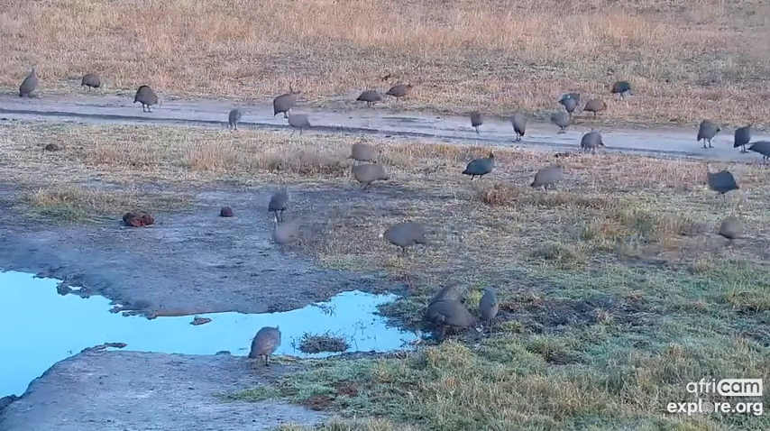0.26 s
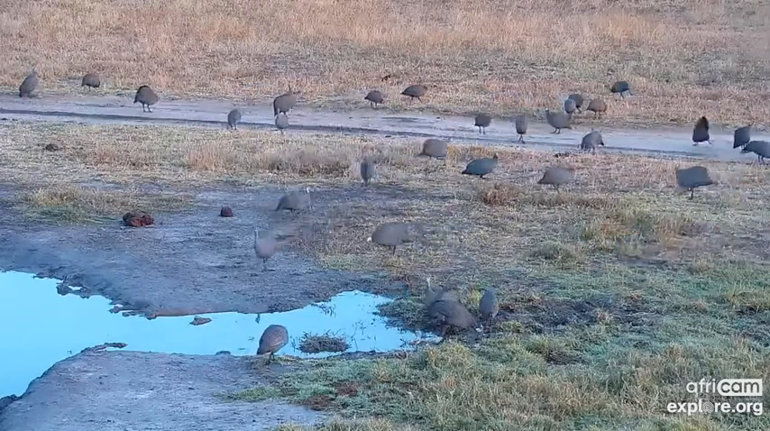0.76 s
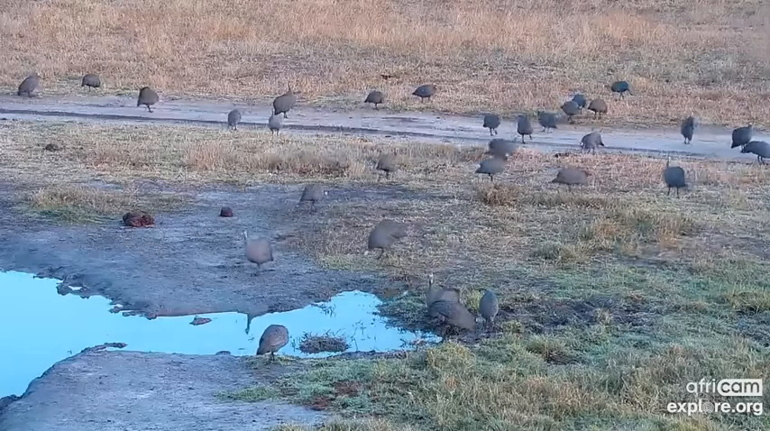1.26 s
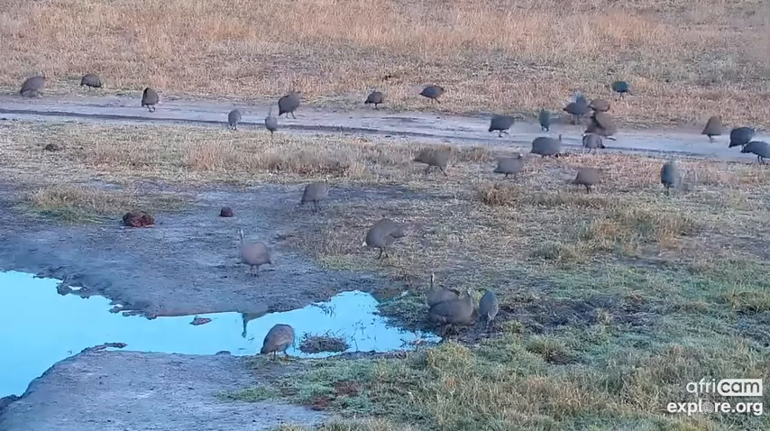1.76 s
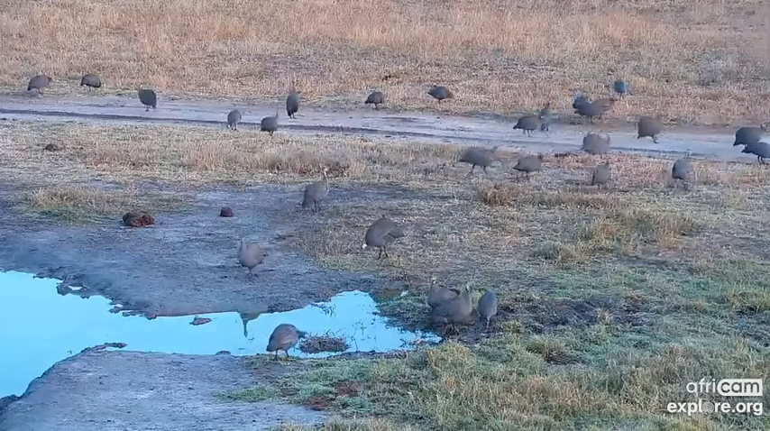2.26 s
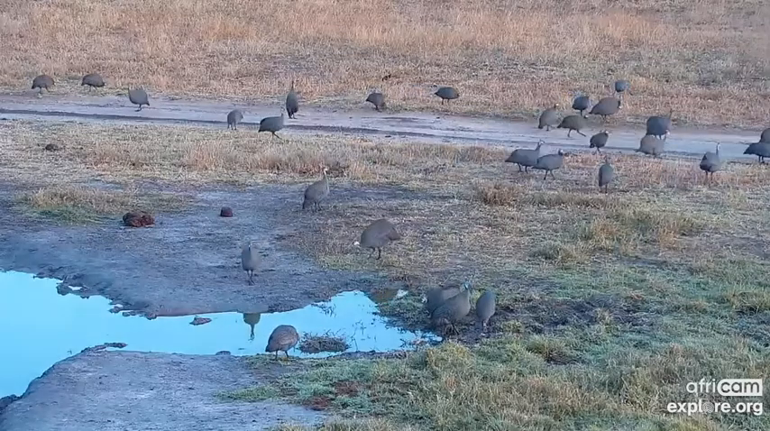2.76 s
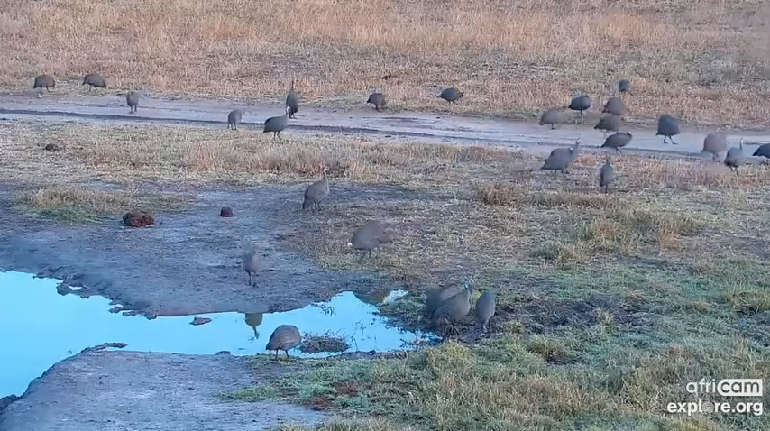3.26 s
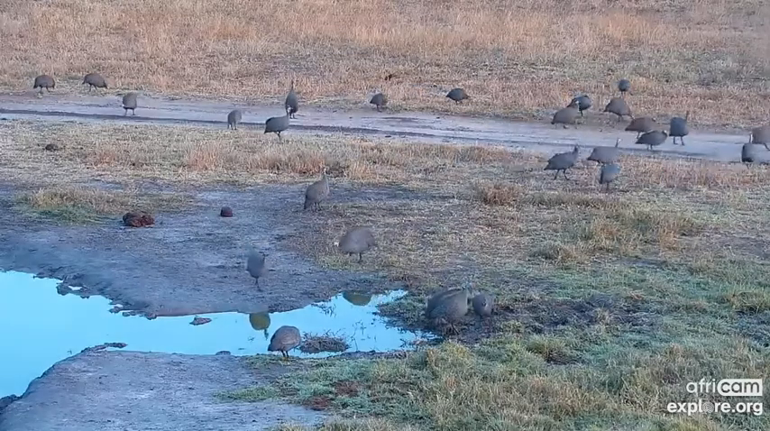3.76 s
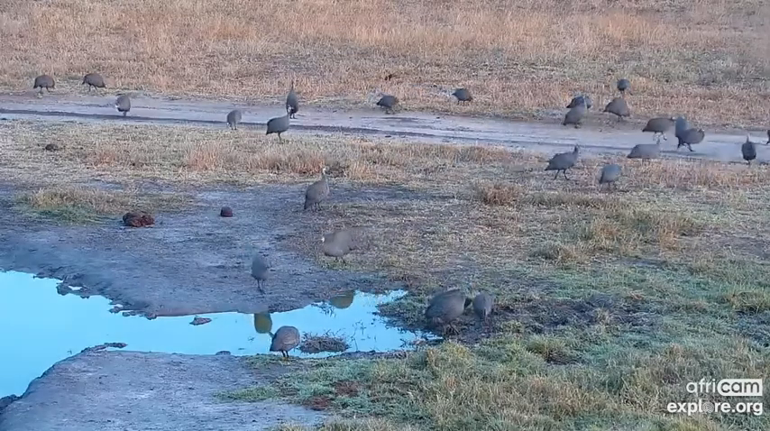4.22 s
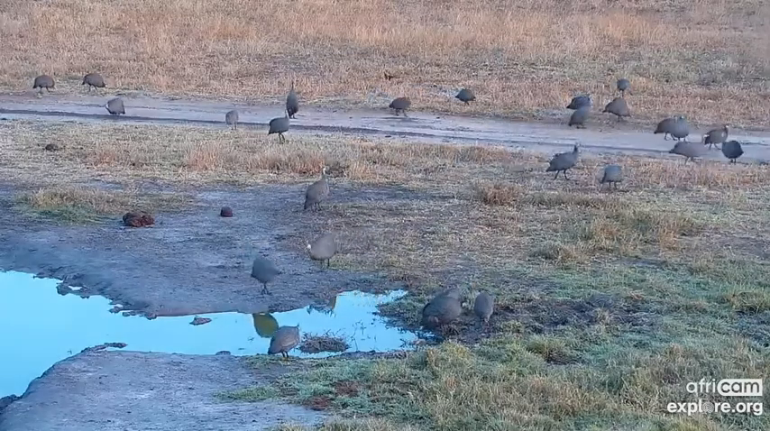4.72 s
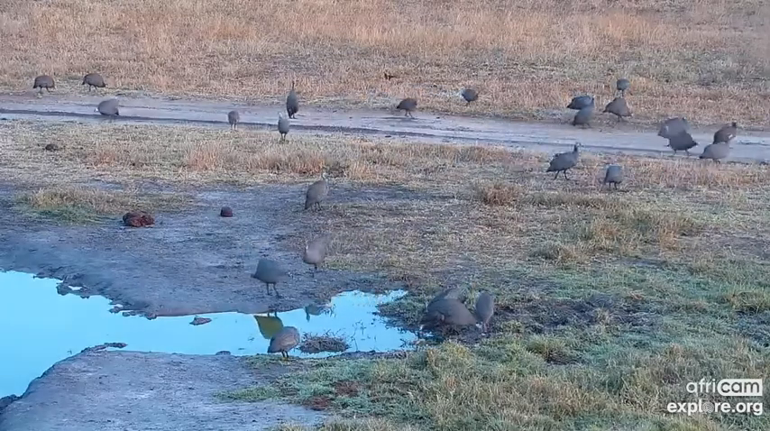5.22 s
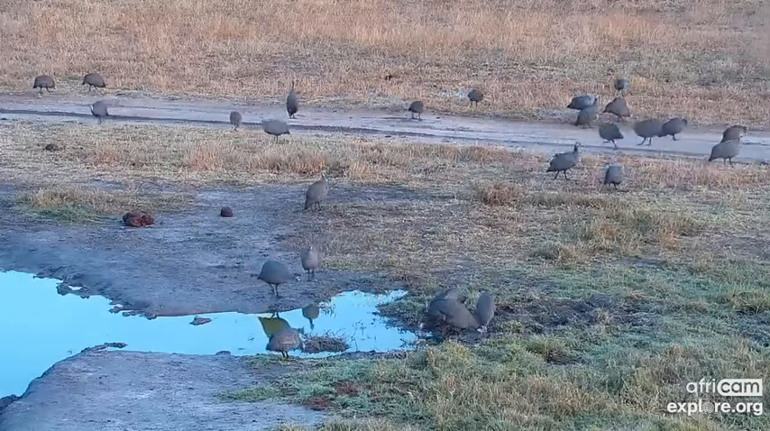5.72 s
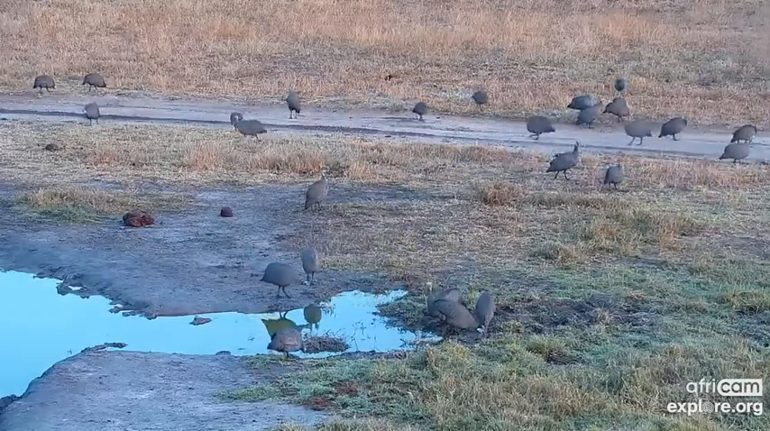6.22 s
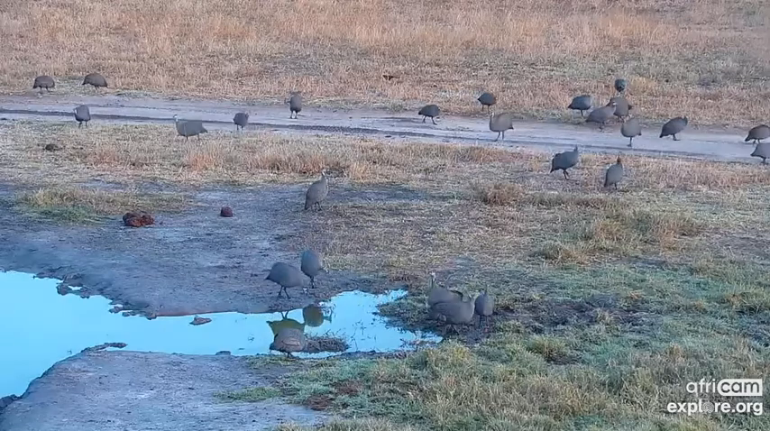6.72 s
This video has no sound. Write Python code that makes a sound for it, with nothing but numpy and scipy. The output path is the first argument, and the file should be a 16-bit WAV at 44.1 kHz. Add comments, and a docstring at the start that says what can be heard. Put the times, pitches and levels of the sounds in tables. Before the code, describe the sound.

A nearby guineafowl chirps and squeaks sharply while its flock pipes farther off, and a distant generator hums steadily.

```python
"""Guineafowl at a waterhole

A flock forages in open bush. Each voice is a membrane in the syrinx, set vibrating by the breath.
Close by, a sharp chirp repeats among squeaks and clucks; other birds pipe and whistle from farther off,
scattered by the scrub. Dry grass rustles, and a distant engine, probably a generator, hums steadily."""
import sys
import numpy as np
from scipy import signal
from scipy.fft import rfft, irfft
from scipy.io import wavfile

SR = 44100
rng = np.random.default_rng(int(sys.argv[2]) if len(sys.argv) > 2 else 0)


def inscribe(sig):
    """Save sig as 16-bit PCM at rate SR to the path in sys.argv[1].

    A 1-D sig is mono; a 2-D sig holds one channel per row.
    Samples are clipped to [-1, 1] before scaling.
    """
    pcm = np.round(np.clip(np.atleast_2d(sig).T, -1, 1) * 32767)
    wavfile.write(sys.argv[1], SR, pcm.astype(np.int16))


N = 307818

# Spectrum of dry hiss, from breath or grass. Each row: frequency in Hz, gain in dB.
HISS_SPECTRUM = [(1200, -17), (3000, 3.5), (6000, 1.5), (8000, 5.5), (11000, -8)]


def chirps(jitter=0.011, onset_jitter=0.03, flutter_db=2.0, rasp_db=-17, onset_db=-4,
           settle_s=0.0028, dispersion=0.85, lead_hz=2400, lead_s=.0155, lead_db=9):
    """Source and filter: a near bird's throat shapes the harmonics and breath noise of its syrinx."""
    # Each row: start in seconds, length in seconds, top pitch in Hz, level in dB,
    # tilt in dB per octave, level of the trailing rasp in dB.
    calls = [(-.008, .03, 1882, -12, -.5, -44), (.408, 0.03, 1892, -12, -0.5, -35.5),
             (.823, .032, 1881, -12, -.5, -34.5), (1.269, .028, 1866, -9.5, .5, -37.5),
             (1.7, 0.03, 1836, -10, 0, -33.5), (2.117, 0.026, 1796, -9, 0, -34.5),
             (3.475, 0.022, 1985, -11, 1, -34), (3.922, 0.031, 1970, -10.5, .5, -33),
             (4.332, 0.027, 1898, -11, 0, -39), (6.591, .016, 1767, -9.5, -2, -57)]
    # Pitch arch. Each row: share of the call, ratio to the top pitch.
    arch = [(0, .96), (.2, .988), (.42, 1), (.65, .992), (1, .955)]
    # Throat resonances. Each row: frequency in Hz, gain in dB.
    throat = [(1700, -22), (1950, -6.5), (2600, -0.5), (3450, -12.5), (3750, -3.5), (5300, -1.5),
              (5900, -0.5), (7050, -1.5), (7500, -6.5), (8800, -14), (9800, -18), (10900, -24.5),
              (12500, -48)]
    out = np.zeros(N)
    for start, length, top_hz, db, tilt_db, trail_db in calls:
        u, gate = note(length, edge_s=0.0026)
        pitch = top_hz * along(arch, u)[0]
        unsettled = np.exp(-u * length / settle_s)   # the membranes need a few cycles to lock
        phase = phase_of(pitch * (1 + (jitter + onset_jitter * unsettled) * wobble(len(u), 700)))
        voice = 0
        for k in range(1, 7):
            level = at_hz(throat, k * pitch) + tilt_db * np.log2(k / 3)
            level += flutter_db * wobble(len(u), 300)
            lag = dispersion * k * k   # the throat delays higher harmonics and smears each pulse
            voice += from_db(level) * np.cos(k * phase - lag)
        breath = coloured(rng.standard_normal(len(u)), throat) * (1 + np.cos(phase))   # a puff a cycle
        rasp = from_db(rasp_db) + from_db(onset_db) * unsettled
        add(out, start - .001, from_db(db) * gate * (voice + rasp * breath))
        # a tiny peep leads the call as the syrinx opens
        u, gate = note(0.0047, edge_s=0.0027)
        peep = whistle(np.full(len(u), lead_hz), rough=0.36, overtone_db=-12.5, rasp_hz=1520)
        add(out, start - lead_s, from_db(trail_db + lead_db) * gate * peep)
        add(out, start + length, trailing_rasp(trail_db))
    return out


def squeaks(hiss_db=-35, drop_per_s2=110):
    """Pitch and amplitude modulation: a thin, hissy whistle arches over and is loudest as it lands."""
    # Each row: start in seconds, length in seconds, top pitch in Hz, landing level in dB,
    # swell in dB, roughness from 0 to 1.
    calls = [(0.26, .028, 4640, -29, 31, 0.13), (2.556, .033, 4310, -11, 10.5, 0.18),
             (2.775, 0.037, 5000, -28, 15, 0.4), (2.984, .047, 5050, -29, 22, 0.34),
             (3.522, 0.036, 4650, -12.5, 26, 0.35), (3.81, 0.03, 4880, -18.5, 23, 0.38),
             (4.167, 0.03, 5300, -32, 17, 0.76), (4.267, .032, 4520, -39, 14, 0.3),
             (4.767, 0.036, 4530, -25.5, 9, 0.38), (5.065, 0.033, 5000, -24, 27, 0.23),
             (5.161, .036, 5430, -35.5, 4, 0.25), (5.987, .042, 4995, -1, 48, 0.25),
             (6.28, .034, 5160, -20.5, 33, 0.37), (6.649, 0.037, 4770, -15, 16, 0.37),
             (6.915, .033, 4740, -18, 28, 0.14)]
    # Contour. Each row: share of the call, pitch height (1 at the top), share of the swell.
    contour = [(0, -0.983, -1.2), (.2, .4, -0.84), (.42, 0.98, -0.57), (.58, 0.74, -0.3),
               (.72, 0.011, -0.1), (.8, -0.0076, -0.011), (.9, -0.07, -0.14), (1, -0.11, -0.68)]
    out = np.zeros(N)
    for start, length, top_hz, db, swell_db, rough in calls:
        u, gate = note(length, edge_s=0.0016)
        height, swell = along(contour, u)
        pitch = top_hz * (1 - drop_per_s2 * length ** 2 * (1 - height))   # longer calls drop farther
        breath = coloured(rng.standard_normal(len(u)), HISS_SPECTRUM)
        hiss = from_db(hiss_db) * rough * np.sqrt(u) * breath
        add(out, start, gate * (from_db(db + swell_db * swell) * whistle(pitch, rough) + hiss))
    return out


def clucks(fall=0.12, jitter=0.032, step_db=-13, dispersion=0.66, taper_db=6, trail_db=-22):
    """Register break: the voice drops low for a few milliseconds, mostly at the end of a squeak."""
    # Each row: start in seconds, length in seconds, pitch in Hz, levels of harmonics 1, 2, 3 in dB.
    calls = [(0.289, 0.011, 1920, -35, -58, -56), (2.59, .0055, 1620, -36, -28, -38),
             (3.026, .0075, 1843, -31, -34, -36), (3.557, 0.0084, 1657, -17, -20, -12.5),
             (4.202, 0.0094, 1886, -22, -20.5, -17.5), (4.298, 0.0074, 1670, -23, -20.5, -26),
             (4.804, 0.0086, 1670, -28, -23.5, -16.5), (6.0265, 0.0059, 1688, -28, -5.5, -17.5),
             (6.373, 0.0084, 1650, -35, -37.5, -43), (6.68, .014, 1670, -24.5, -26.5, -23)]
    out = np.zeros(N)
    for start, length, hz, *levels in calls:
        u, gate = note(length, edge_s=0.0018)
        phase = phase_of(hz * (1 - fall * (u - .5) + jitter * wobble(len(u), 1100)))
        levels += [levels[-1] + step_db * k for k in range(1, 4)]   # harmonics 4 to 6 roll off
        voice = sum(from_db(db) * np.cos(k * phase - dispersion * k * k)
                    for k, db in enumerate(levels, 1))
        taper = from_db(taper_db * (0.1751 - (2 * u - 1) ** 2))
        add(out, start - .001, taper * gate * voice)
        add(out, start + length, trailing_rasp(levels[2] + trail_db, length=0.043))
    return out


def trailing_rasp(db, length=0.042, fall_db=10, grain_db=4.0, grain_hz=200):
    """Exponential decay: a dry, grainy band of noise dies away after a call."""
    # Each row: frequency in Hz, gain in dB.
    spectrum = [(1300, -19), (2400, 6), (3600, 9.5), (5300, -6), (7500, -3), (11000, -13)]
    u, gate = note(length, edge_s=0.0023)
    level = db - fall_db * u + grain_db * wobble(len(u), grain_hz)
    return from_db(level) * gate * coloured(rng.standard_normal(len(u)), spectrum)


def pipes(lift=0.0302, swell_db=11, brighten_db=7, jitter=0.0022):
    """Strong odd harmonics make a hollow timbre; these long notes brighten as they swell."""
    # Each row: start in seconds, length in seconds, pitch in Hz, level in dB, overtone gain in dB.
    calls = [(.44, 0.18, 1830, -40, 2), (1.30, 0.18, 1845, -32, -0.5), (2.15, 0.23, 1805, -30.5, 1),
             (3.04, 0.26, 1808, -31, -2), (4.99, .295, 1818, -34.5, -10), (5.89, .25, 1829, -30.5, -12),
             (6.795, 0.29, 1794, -28, 1)]
    # Each row: harmonic number, relative level in dB.
    harmonics = [(1, -4), (2, -21.5), (3, -8.5), (4, -18.5)]
    out = np.zeros(N)
    for start, length, hz, db, overtones_db in calls:
        u, gate = note(length, edge_s=0.0094)
        phase = phase_of(hz * (1 + lift * u ** 3 + jitter * wobble(len(u), 120)))
        off_peak = abs(u - .75)
        bright_db = overtones_db - brighten_db * off_peak
        voice = sum(from_db(level + bright_db * (k > 1) + 0.67 * wobble(len(u), 32)) * np.sin(k * phase)
                    for k, level in harmonics)
        add(out, start, from_db(db - swell_db * off_peak) * gate * voice)
    return out


def whistle(hz, rough, jitter=0.045, flutter_db=7.0, rough_hz=260, overtone_db=-31, rasp_hz=480):
    """Random modulation: an unsteady membrane shakes a near sine and spreads noise sidebands round it."""
    size = len(hz)
    phase = phase_of(hz * (1 + jitter * rough * wobble(size, rough_hz)))
    tone = np.sin(phase) + from_db(overtone_db) * np.sin(2 * phase)
    flutter = from_db(flutter_db * rough * (wobble(size, rough_hz) - .5))
    sidebands = wobble(size, rasp_hz) * np.sin(phase) + wobble(size, rasp_hz) * np.cos(phase)
    return tone * flutter + 0.85 * rough * sidebands


def slurs(settle=4.5, rough=0.23, overshoot=.17):
    """Exponential relaxation: a whistle starts high and clears as it settles on a held note."""
    # Each row: start in seconds, length in seconds, final pitch in Hz, level in dB.
    calls = [(0.577, 0.065, 3600, -29.5), (0.698, .052, 3570, -29.5), (0.785, 0.081, 3610, -26.5),
             (0.902, 0.069, 3490, -29), (0.973, 0.026, 3850, -24), (3.881, .10, 3520, -31),
             (4.16, .073, 3510, -27.5), (4.361, 0.074, 3550, -28.5), (4.476, 0.049, 3540, -27.5),
             (4.576, 0.06, 3506, -29.5), (4.683, 0.042, 3446, -32), (6.691, .091, 3596, -27),
             (6.815, 0.072, 3560, -28.5), (6.922, 0.085, 3620, -26.5)]
    # Each row: share of the call, gain in dB.
    envelope = [(0, -10), (.14, -7.5), (.21, -4), (.6, 3.5), (.8, -1), (1, -8)]
    out = np.zeros(N)
    for start, length, hz, db in calls:
        u, gate = note(length, edge_s=0.0052)
        pitch = hz * (1 + overshoot * np.exp(-settle * u))
        voice = whistle(pitch, rough * np.exp(-2 * u))
        add(out, start, from_db(db + along(envelope, u)[0]) * gate * voice)
    return out


def whistled(calls, bend, rough, falter_db=2.0, falter_hz=50):
    """Amplitude envelope: whistles swell, falter and fade; bend(share, length) is their pitch ratio."""
    # Each row: share of the call, gain in dB.
    envelope = [(0, -7.5), (.15, -3), (.5, -0.5), (.8, -2), (1, -6.5)]
    out = np.zeros(N)
    for start, length, hz, db in calls:
        u, gate = note(length, edge_s=0.0045)
        level = db + along(envelope, u)[0] + falter_db * wobble(len(u), falter_hz)
        add(out, start, from_db(level) * gate * whistle(hz * bend(u, length), rough))
    return out


def peeps(crest=0.39, rise_octaves=.44, fall_octaves=.52, ease=1.4):
    """A two-way frequency sweep: a quick climb to a pointed crest, then a slide that eases off."""
    # Each row: start in seconds, length in seconds, crest pitch in Hz, level in dB.
    calls = [(.553, 0.039, 3250, -36), (.924, 0.058, 5470, -32.5), (2.365, 0.051, 4300, -30.5),
             (2.402, 0.043, 3440, -34.5), (2.518, 0.069, 4020, -30), (2.853, .035, 5630, -43),
             (3.343, .055, 4000, -41), (5.143, .06, 4180, -31), (5.207, 0.048, 3740, -31.5),
             (5.309, 0.061, 4600, -29), (5.376, 0.036, 3750, -32)]

    def bend(u, length):
        climb = np.clip(u / crest, 0, 1)
        slide = np.clip((u - crest) / (1 - crest), 0, 1)
        return 2 ** (-rise_octaves * (1 - climb) - fall_octaves * (1 - (1 - slide) ** ease))
    return whistled(calls, bend, rough=0.39, falter_db=2.5, falter_hz=90)


def sighs(fall_octaves=.35):
    """An exponential sweep: husky whistles sink by equal intervals in equal times."""
    # Each row: start in seconds, length in seconds, first pitch in Hz, level in dB.
    calls = [(1.028, 0.094, 4050, -28), (1.295, .08, 3580, -28.5), (2.321, 0.034, 5400, -40),
             (2.465, 0.042, 1450, -39), (2.548, .035, 3460, -33), (2.592, 0.03, 4140, -32),
             (2.679, .15, 1165, -40.5), (3.378, 0.066, 3050, -33.5), (3.612, .035, 3200, -35),
             (3.672, .067, 3230, -35.5), (3.974, 0.038, 3720, -30), (4.229, 0.037, 3700, -37.5),
             (4.811, 0.021, 2800, -35), (4.865, 0.093, 3920, -30.5)]
    return whistled(calls, lambda u, length: 2 ** (-fall_octaves * u), rough=.28)


def upturns(lift=.125):
    """A cubic glide: clear notes start level and turn up at the end."""
    # Each row: start in seconds, length in seconds, first pitch in Hz, level in dB.
    calls = [(.544, .14, 2130, -37.5), (1.21, .13, 2120, -34.5), (3.738, 0.14, 2280, -41),
             (5.598, 0.14, 2187, -38.5), (6.255, 0.16, 2134, -39.5)]
    return whistled(calls, lambda u, length: 1 + lift * u ** 3, rough=0.16)


def held_notes(sag=0.0327):
    """Nearly steady oscillation: clear notes whose pitch barely sags."""
    # Each row: start in seconds, length in seconds, middle pitch in Hz, level in dB.
    calls = [(-.03, 0.093, 2580, -29.5), (2.414, 0.187, 2655, -43), (4.952, .15, 2627, -33.5),
             (6.316, .14, 2614, -33)]
    return whistled(calls, lambda u, length: 1 - sag * (u - .5), rough=0.13)


def lisps(rise_per_s=.8):
    """A linear sweep: high, breathy notes climb at a steady rate."""
    # Each row: start in seconds, length in seconds, first pitch in Hz, level in dB.
    calls = [(1.607, .13, 6440, -46), (2.521, 0.13, 6570, -47), (6.143, .055, 6430, -42)]
    return whistled(calls, lambda u, length: 1 + rise_per_s * u * length, rough=0.38)


def mews(top=0.23, bend_per_s2=27):
    """A Gaussian pitch arc: short, low notes stay near its top, long ones droop."""
    # Each row: start in seconds, length in seconds, top pitch in Hz, level in dB.
    calls = [(2.565, 0.17, 1860, -39.5), (2.879, 0.028, 1663, -29.5), (5.797, 0.137, 1870, -41),
             (6.756, .035, 1570, -39)]
    return whistled(calls, lambda u, length: np.exp(-bend_per_s2 * ((u - top) * length) ** 2), rough=0.13)


def pips(fall=0.14, period_s=.039, pip_s=.013):
    """Tone bursts: soft, low, falling notes, single or in evenly paced runs."""
    # Each row: start in seconds, length of the run in seconds, middle pitch in Hz, level in dB.
    runs = [(.169, .02, 1130, -44), (.61, .02, 1140, -41), (1.325, .14, 1285, -40.5),
            (4.879, .17, 1300, -48)]
    calls = [(start + delay, pip_s, hz, db)
             for start, length, hz, db in runs for delay in np.arange(0, length, period_s)]
    return whistled(calls, lambda u, length: 1 - fall * (u - .5), rough=.28)


def far_flock(count=55, level_db=-48, centre_hz=4000, spread=0.5, fall=0.201, size_db=8):
    """Independent sources: far birds give faint falling peeps at random, the longer ones louder."""
    out = np.zeros(N)
    for when, size, pitch in rng.random((count, 3)):
        u, gate = note(0.018 + 0.036 * size, edge_s=0.0092)
        hz = centre_hz * np.exp(spread * (2 * pitch - 1) - fall * (u - .5))
        level = level_db + size_db * (size - .5)
        add(out, when * N / SR, from_db(level) * gate * whistle(hz, rough=0.51))
    return out


def ticks(gain_db=-3, decay_s=0.0017, low_cut_hz=2800):
    """Broadband transients: noise that decays within milliseconds is heard as small dry clicks."""
    # Each row: start in seconds, relative level in dB.
    clicks = [(1.0715, -26.5), (1.5878, -23), (2.8344, -27.5), (3.0464, -26), (3.3159, -23.5),
              (4.6104, -23), (5.5613, -28), (6.134, -24.5), (6.5161, -23.5), (6.8623, -22.5)]
    out = np.zeros(N)
    t = np.arange(SR // 50) / SR
    for start, db in clicks:
        add(out, start, from_db(db + gain_db) * np.exp(-t / decay_s) * rng.standard_normal(len(t)))
    return signal.sosfilt(signal.butter(1, low_cut_hz, "high", fs=SR, output="sos"), out)


def rustles(grain_db=4.0, grain_hz=250):
    """Friction noise: dry stalks brush in uneven grains."""
    # Each row: start in seconds, length in seconds, level before filtering in dB.
    bursts = [(2.847, 0.083, -43), (3.031, .12, -52), (4.981, .025, -45), (5.857, 0.036, -50)]
    out = np.zeros(N)
    for start, length, db in bursts:
        u, gate = note(length, edge_s=0.0045)
        grains = from_db(db + grain_db * wobble(len(u), grain_hz))
        add(out, start, grains * gate * rng.standard_normal(len(u)))
    return coloured(out, HISS_SPECTRUM)


def scrub(x, t60_s, dull_hz, build_s=0.013):
    """Diffuse scattering: vegetation returns a dull tail that falls 60 dB in t60_s."""
    t = np.arange(SR) / SR
    tail = rng.standard_normal(SR) * from_db(-60 * t / t60_s) * np.clip(t / build_s, 0, 1)
    tail = signal.sosfilt(signal.butter(2, dull_hz, fs=SR, output="sos"), tail / np.linalg.norm(tail))
    return signal.fftconvolve(x, tail)[:N]


def generator(cycle_hz=12.735, blade_hz=223.4, weak_db=-66, waver_db=2.05, speed_drift=0.001197):
    """Harmonic series: an engine and its cooling fan turn on one governed shaft and drift together."""
    # Six firings a cycle make order 6 the strongest. Each row: multiple of the cycle, rms level in dB.
    engine_orders = [(4, -49), (5, -68), (6, -30), (7, -51), (8, -48.5), (9, -46.5), (10, -62), (11, -45.5),
                     (12, -43.5), (15, -55.5), (16, -61), (18, -59), (22, -62), (24, -58), (28, -54),
                     (32, -56), (45, -59), (55, -65)]
    # Each row: multiple of the blade rate, rms level in dB.
    fan_tones = [(2, -56), (3, -56.5), (4, -53)]
    phase_per_hz = phase_of(1 + speed_drift * wobble(N, 1.55))
    orders = {k: weak_db for k in range(13, 58)} | dict(engine_orders)
    lines = [(k * cycle_hz, db) for k, db in orders.items()]
    lines += [(k * blade_hz, db) for k, db in fan_tones]
    wavers = [from_db(waver_db * wobble(N, 1.9)) for _ in range(5)]
    out = np.zeros(N)
    for i, (hz, db) in enumerate(lines):
        waver = wavers[i % len(wavers)] if hz > 13 * cycle_hz else 1   # the air makes upper lines waver
        out += np.sqrt(2) * from_db(db) * waver * np.sin(hz * phase_per_hz + rng.uniform(0, 2 * np.pi))
    return out


def open_air():
    """A continuous spectrum: engine rumble and open air make a steady bed of noise."""
    # Each row: frequency in Hz, power density in dB per Hz.
    density = [(20, -89), (36, -66), (75, -59.5), (125, -64.5), (170, -68.5), (400, -70.5), (520, -76.5),
               (880, -75.5), (1120, -86.5), (1700, -84.5), (3700, -87), (6000, -89), (10800, -94),
               (12000, -102)]
    return coloured(rng.standard_normal(N), density) * np.sqrt(SR / 2)


def from_db(db):
    """Amplitude ratio of a level in decibels."""
    return 10 ** (np.asarray(db) / 20)


def at_hz(spectrum, hz):
    """Level of a spectrum, interpolated on a log-frequency axis."""
    f, db = np.transpose(spectrum)
    return np.interp(np.log(np.maximum(hz, 1)), np.log(f), db)


def along(contour, u):
    """Columns of a contour, interpolated at the shares u of the call."""
    share, *columns = np.transpose(contour)
    return [np.interp(u, share, column) for column in columns]


def wobble(size, rate_hz):
    """Low-pass noise with a standard deviation of 1."""
    f = np.arange(size + 1) * SR / (2 * size)
    slow = irfft(rfft(rng.standard_normal(2 * size)) / (1 + (f / rate_hz) ** 4))
    return slow[:size] / slow.std()


def note(length, edge_s):
    """Share u of the call elapsed at each sample, and a gate with raised-cosine edges."""
    t = np.arange(int((max(length, .003) + edge_s) * SR)) / SR
    ramp = np.clip(np.minimum(t, t[-1] - t) / edge_s, 0, 1)
    return t / t[-1], np.sin(np.pi / 2 * ramp) ** 2


def phase_of(hz):
    """Phase is the running integral of frequency."""
    return 2 * np.pi * np.cumsum(hz) / SR


def add(out, start_s, sound):
    """Superposition: a sound joins the mix at its start time."""
    start = int(start_s * SR)
    sound = sound[max(-start, 0):max(N - start, 0)]
    start = max(start, 0)
    out[start:start + len(sound)] += sound


def coloured(x, spectrum):
    """Zero-phase filtering: each frequency is scaled by the gain of a spectrum."""
    hz = np.arange(len(x) + 1) * SR / (2 * len(x))
    return irfft(rfft(x, 2 * len(x)) * from_db(at_hz(spectrum, hz)))[:len(x)]


def scene():
    """Direct and scattered sound: far birds have the larger share of the long tail; a hum lies below."""
    near = chirps() + squeaks() + clucks()
    ringing = slurs()   # these carry to the tree line and linger
    whistles = peeps() + sighs() + upturns() + held_notes() + lisps() + mews() + pips()
    far = pipes() + ringing + whistles + far_flock() + ticks() + rustles()
    close_scatter = scrub(from_db(-18.5) * near + from_db(-20.5) * far, t60_s=0.039, dull_hz=6400)
    wide_scatter = scrub(from_db(-31.5) * near + from_db(-12.0) * far, t60_s=0.7, dull_hz=6040)
    tree_line = scrub(from_db(-10.5) * ringing, t60_s=0.92, dull_hz=6040)
    return (near + far + close_scatter + wide_scatter + tree_line + open_air() + generator())[None]


def record(dry, ceiling=.88, cutoff_hz=11300):
    """Soft saturation rounds the highest peaks, and a steep low-pass cuts the top."""
    rounded = dry / (1 + (dry / ceiling) ** 8) ** (1 / 8)
    return signal.sosfilt(signal.ellip(10, .1, 80, cutoff_hz, fs=SR, output="sos"), rounded)


dry = scene()
out = record(dry)
inscribe(out)
```